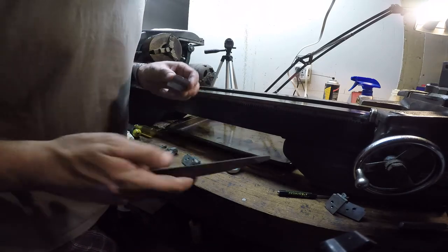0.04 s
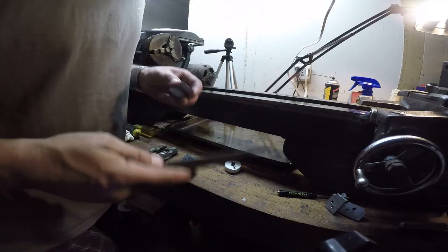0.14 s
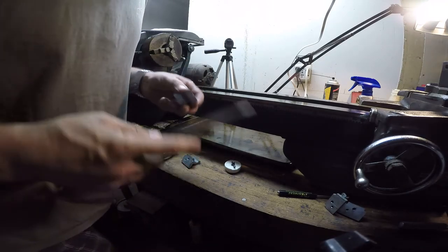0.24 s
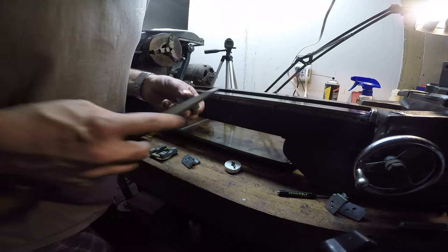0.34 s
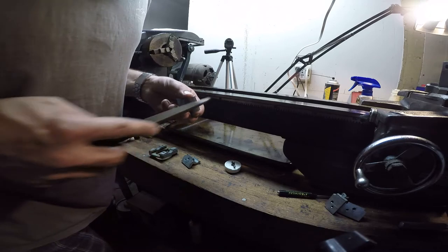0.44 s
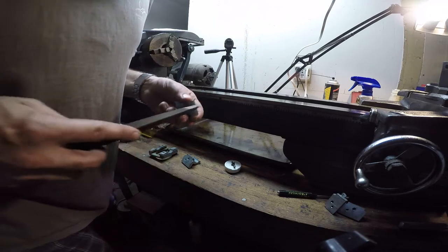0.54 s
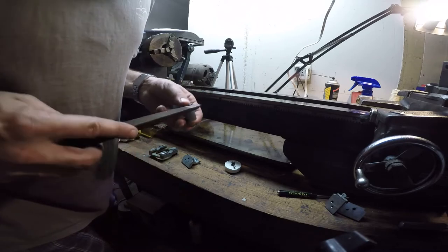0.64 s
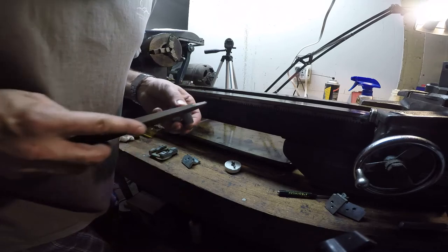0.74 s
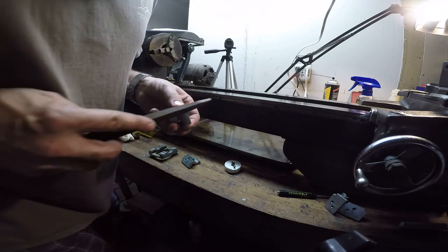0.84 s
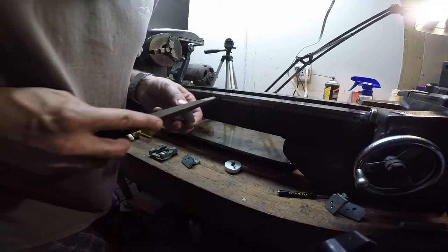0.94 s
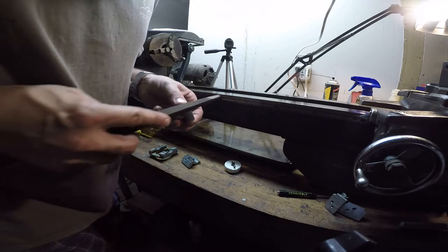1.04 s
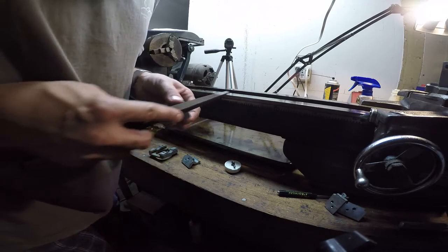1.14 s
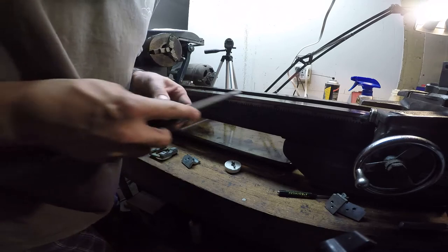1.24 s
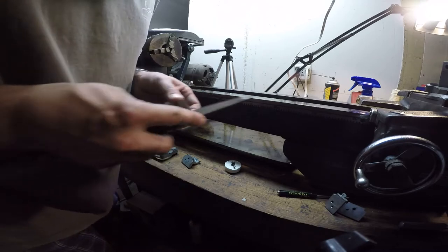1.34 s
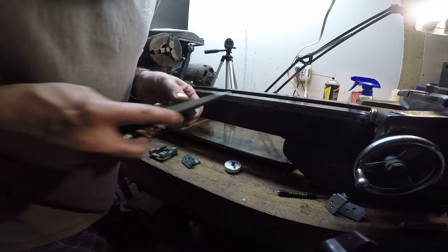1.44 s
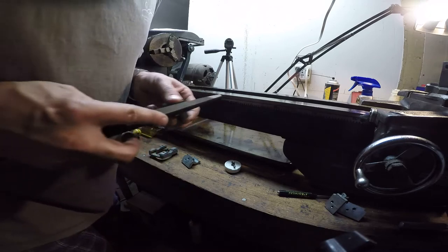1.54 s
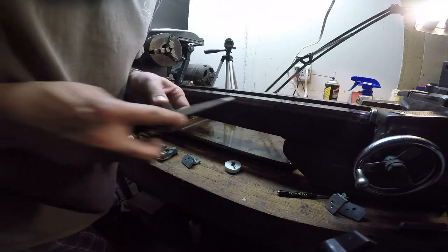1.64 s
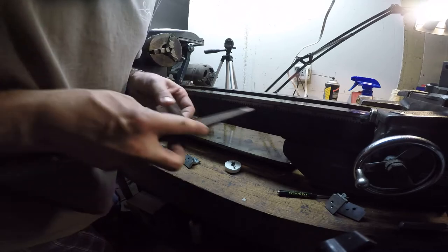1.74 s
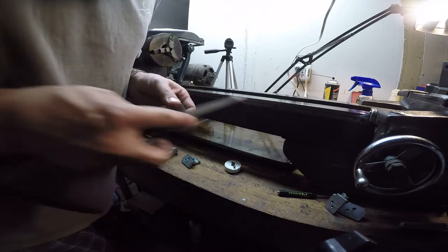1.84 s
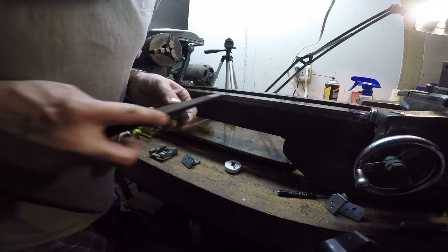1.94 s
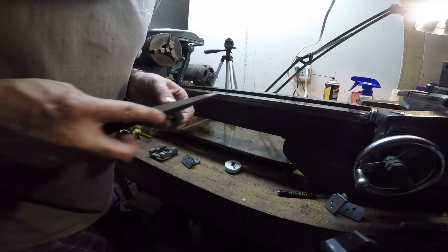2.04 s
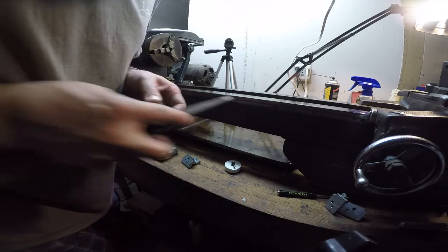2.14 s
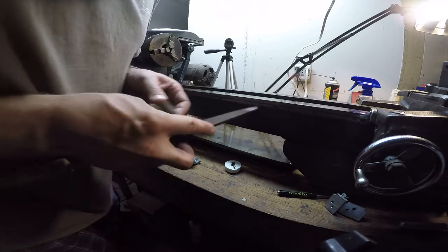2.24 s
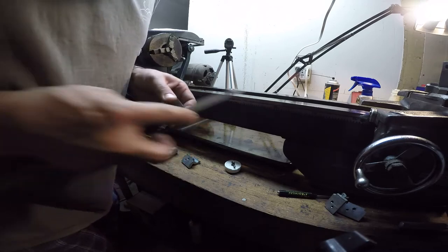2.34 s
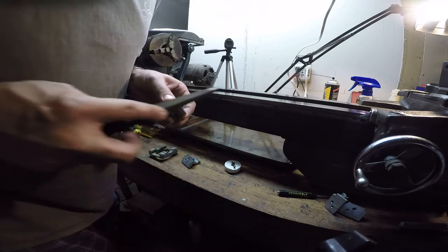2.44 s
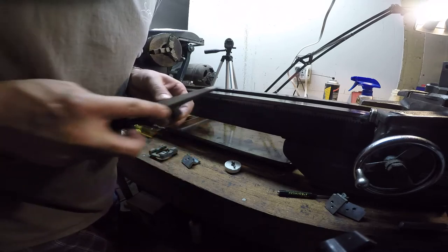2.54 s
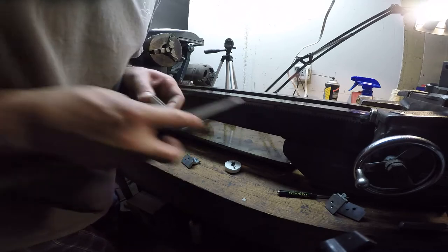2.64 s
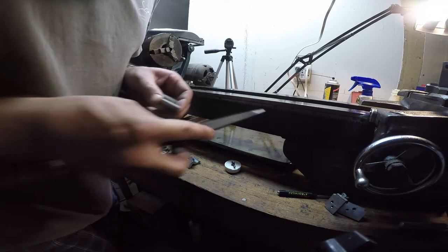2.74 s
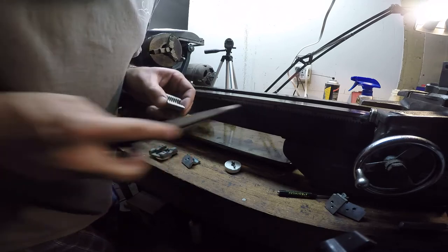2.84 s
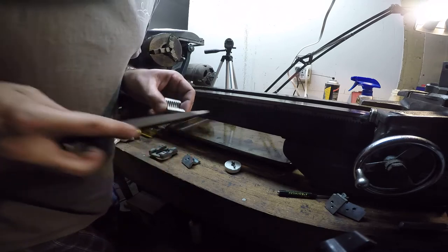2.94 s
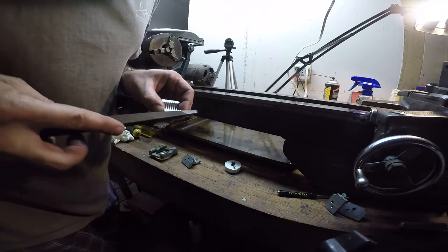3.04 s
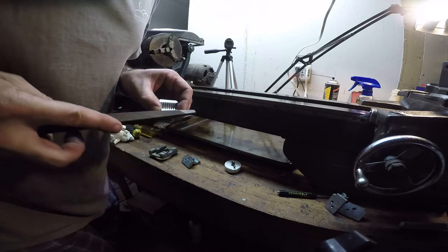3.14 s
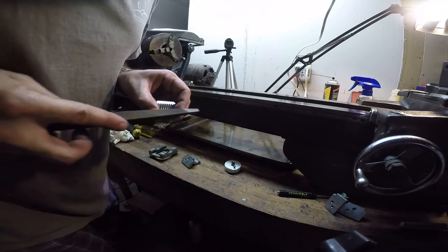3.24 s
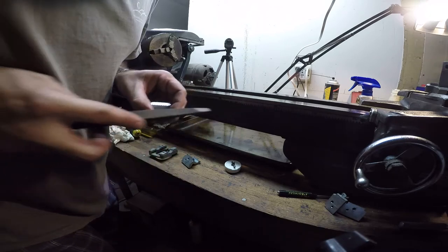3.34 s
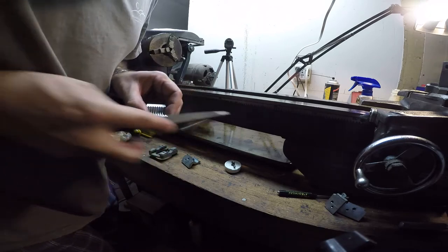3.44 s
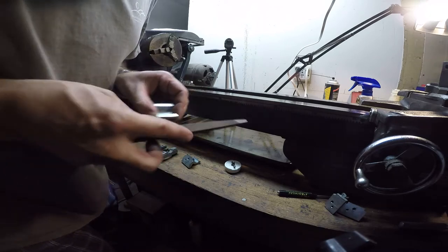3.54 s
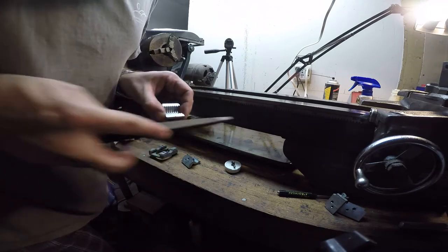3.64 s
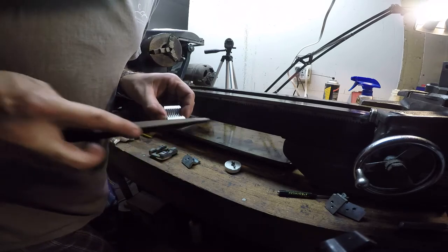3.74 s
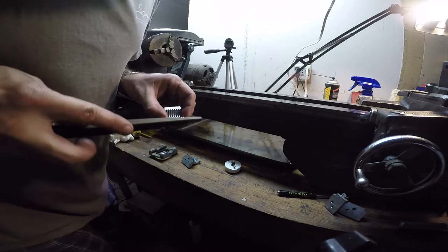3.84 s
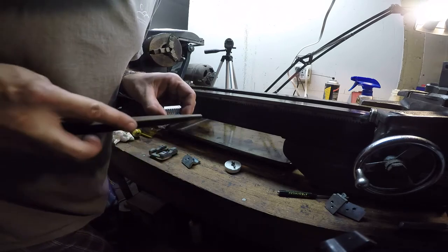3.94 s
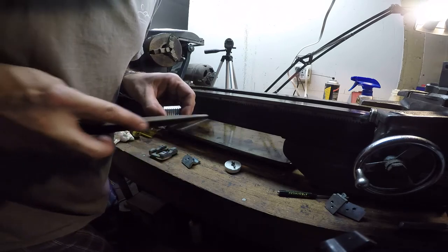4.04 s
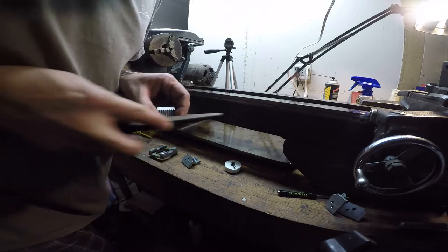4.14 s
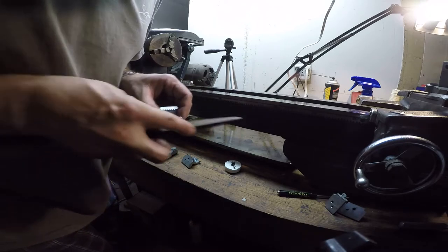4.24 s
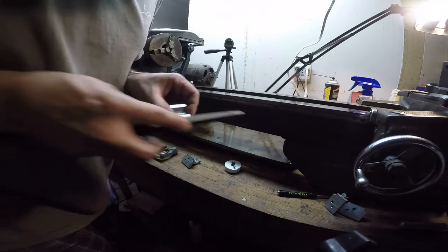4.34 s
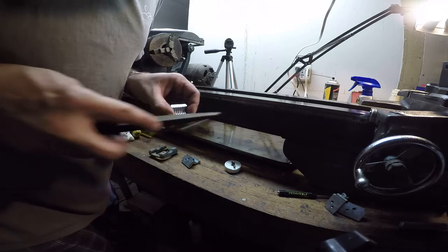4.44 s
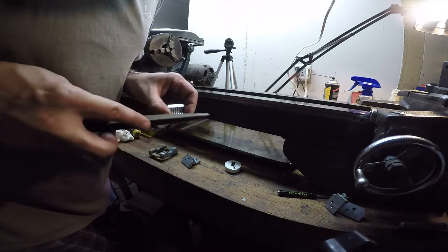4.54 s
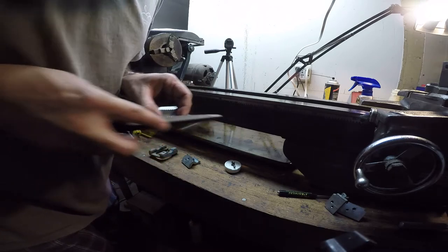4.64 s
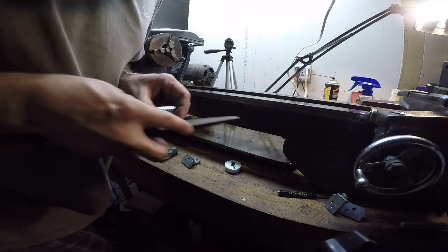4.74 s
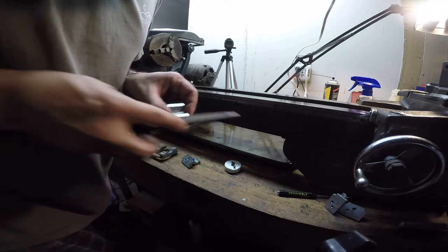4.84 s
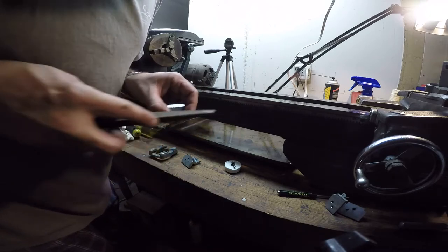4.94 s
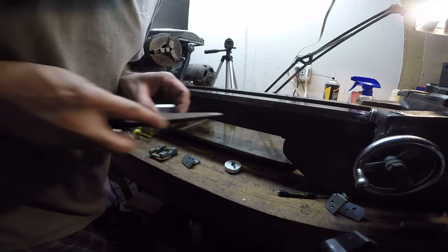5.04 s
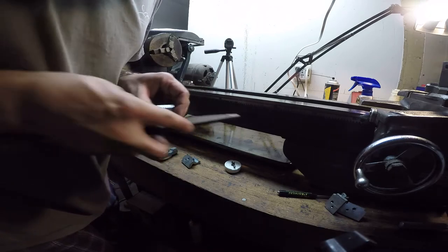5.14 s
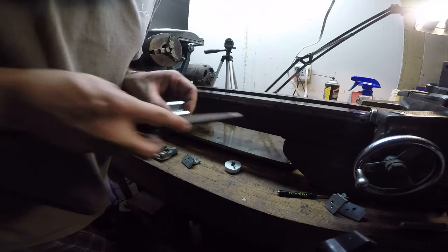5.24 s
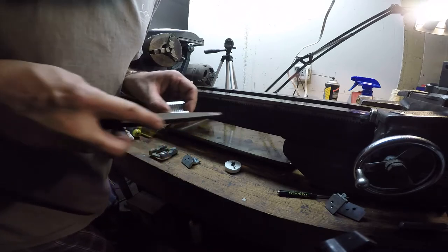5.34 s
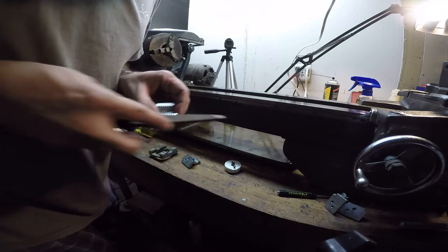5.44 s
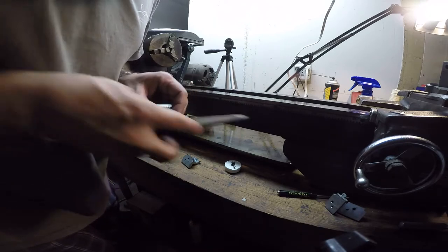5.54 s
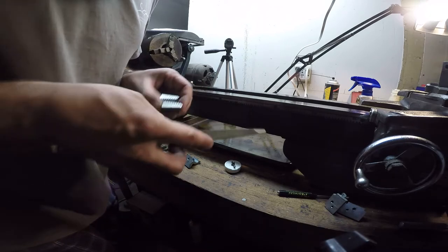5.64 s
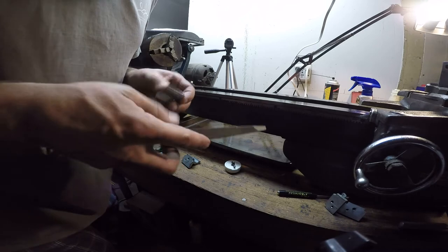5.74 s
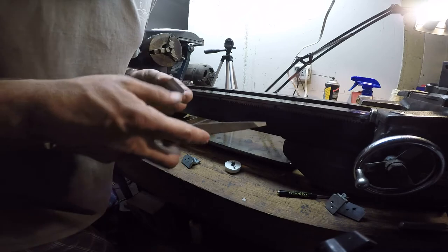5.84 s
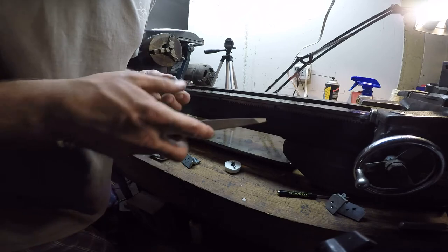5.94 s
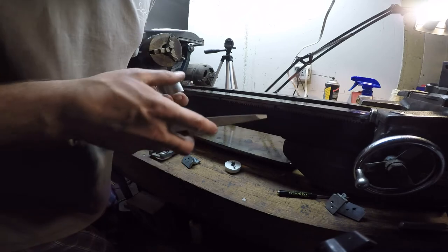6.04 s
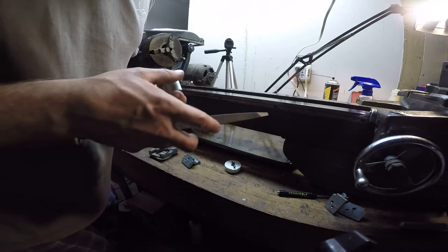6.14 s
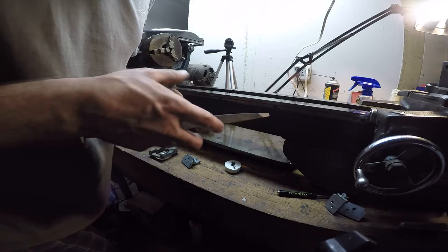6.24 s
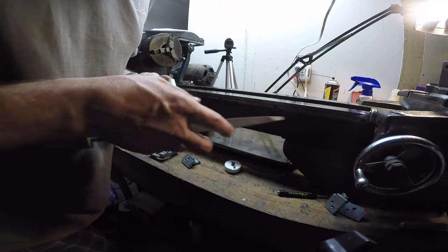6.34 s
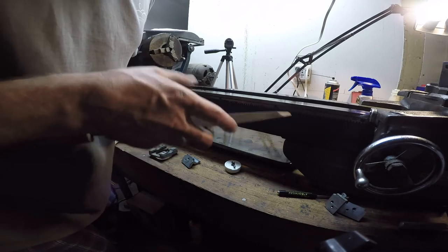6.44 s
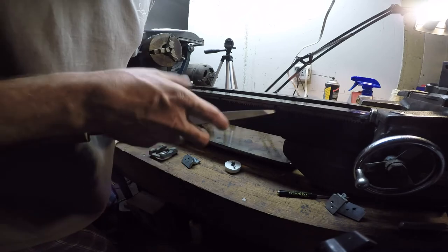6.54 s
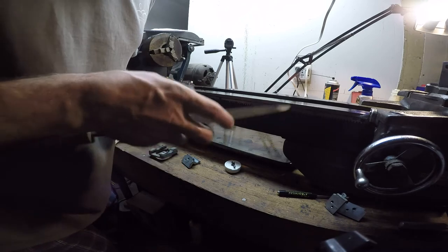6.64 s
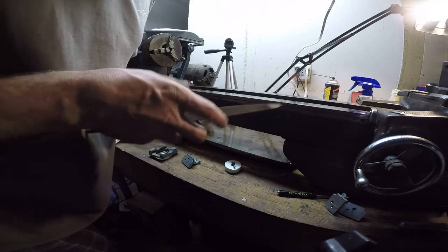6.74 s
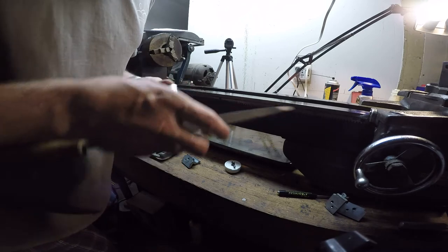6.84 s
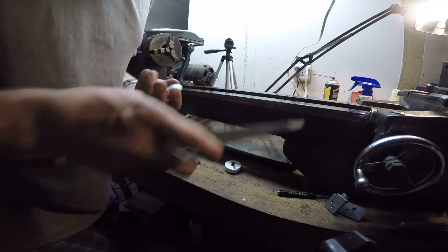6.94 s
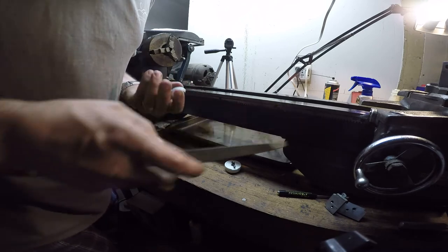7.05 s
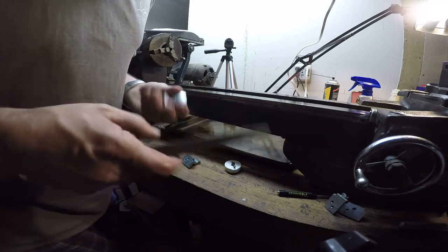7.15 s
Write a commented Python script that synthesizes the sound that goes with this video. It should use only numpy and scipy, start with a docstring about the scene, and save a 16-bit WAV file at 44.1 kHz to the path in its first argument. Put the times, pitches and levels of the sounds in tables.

```python
"""A quiet workshop, one microphone close to a small metal part held in the fingers.
First the room tone: low rumble, hiss, mains hum and a thin electrical whine. Just before one second
a flat hand file is set down with a tick. Nine short strokes follow, the first over a dull rub: the teeth
rasp over the edge and ring the steel, and the small room answers. In the sixth, near four seconds,
they catch evenly and squeal. The last stroke ends before six seconds and leaves the room tone."""
import sys
import numpy as np
from scipy import signal
from scipy.fft import rfft, irfft
from scipy.io import wavfile

SR = 44100
rng = np.random.default_rng(int(sys.argv[2]) if len(sys.argv) > 2 else 0)


def wav_record(signal):
    """Record a signal, one row per channel, as 16-bit PCM in the file named by sys.argv[1]."""
    frames = np.transpose(np.atleast_2d(signal))
    bounded = np.clip(frames, -1, 1)
    # unit amplitude maps onto the largest positive 16-bit level
    quanta = np.round(bounded * 32767).astype(np.int16)
    wavfile.write(sys.argv[1], SR, quanta)


N = 317299


def undb(db):
    """Decibels to gain."""
    return 10 ** (np.asarray(db) / 20)


def unit(x):
    """Scale to rms 1."""
    return x / np.sqrt(np.mean(x ** 2))


def gains(points, size):
    """Gain of a (Hz, dB) spectrum on the bins of a transform."""
    hz, db = np.transpose(points)
    bin_hz = np.arange(size // 2 + 1) * SR / size
    return undb(np.interp(np.log(bin_hz + 1), np.log(hz), db))


def lowpass(x, hz, order=2):
    """Butterworth low-pass."""
    return signal.sosfilt(signal.butter(order, hz, fs=SR, output="sos"), x)


def brighten(x, db, corner_hz):
    """Raise or lower everything above the corner."""
    backward = lowpass(x, corner_hz, order=3)[::-1]
    dull = lowpass(backward, corner_hz, order=3)[::-1]
    return dull + undb(db) * (x - dull)


def walk(rate, size):
    """A smooth random wander with a spread near 1 and `rate` new values a second."""
    knots = np.arange(size) * rate / SR
    count = int(knots[-1]) + 2
    return np.interp(knots, np.arange(count), rng.standard_normal(count))


def clicks(places, heights, size, lobes=8):
    """Band-limited clicks at fractional sample places."""
    index = places.astype(int)[:, None] + np.arange(1 - lobes, lobes + 1)
    offset = index - places[:, None]
    shape = heights[:, None] * np.sinc(offset) * np.sinc(offset / lobes)
    return np.bincount(np.clip(index, 0, size - 1).ravel(), shape.ravel(), size)


def add(track, start_s, sound):
    """Mix a sound into the track."""
    start = int(start_s * SR)
    track[start:start + len(sound)] += sound[:N - start]


# The workshop air at the microphone. Each row: frequency in Hz, relative density in dB.
AIR_SPECTRUM = [(10, -11), (26, -0.5), (52, -1), (80, -11), (170, -13), (350, -22.5), (700, -27),
                (1500, -29.5), (2600, -28.5), (5000, -32.5), (9000, -38), (15000, -41.5)]


def air(level_db=-57.5):
    """Steady low rumble and even hiss fill the room."""
    noise = rfft(rng.standard_normal(N))
    return undb(level_db) * unit(irfft(noise * gains(AIR_SPECTRUM, N), N))


# Electrical tones in the background. Each row: frequency in Hz, rms level in dB.
MAINS_TONES = [(59.5, -65), (5560, -85.5), (6293.6, -78.5), (6323, -85.5), (12586, -90.5), (12617.4, -72)]


def mains(flutter_db=1.5):
    """Mains hum and a thin electrical whine flutter slightly together."""
    t = np.arange(N) / SR
    tones = sum(undb(db) * np.sin(2 * np.pi * (hz * t + rng.random())) for hz, db in MAINS_TONES)
    return np.sqrt(2) * tones * undb(flutter_db * walk(100, N))


# Close by, the blade knocks on the part or a tooth catches its edge. Each row: start in seconds,
# force in dB, hardness as a cutoff in Hz, boost of the main ring in dB.
KNOCKS = [(.860, -52.5, 6500, -7), (0.966, -48, 6000, -3), (1.020, -44, 4500, -8),
          (1.0779, -31.5, 3480, -9), (1.0885, -32, 3400, -7), (1.111, -34, 3380, 0.5),
          (1.1235, -30.5, 3150, 0), (1.1503, -25.5, 3700, -10), (1.177, -27, 3200, -10),
          (1.4845, -34.5, 3160, -7.5), (1.613, -33, 3000, 6), (2.0305, -29, 6400, -14),
          (2.5368, -34, 4600, -2), (3.2088, -44.5, 1900, 5), (3.358, -45, 6000, -12.5),
          (3.989, -36.5, 2681, -5), (4.127, -29.5, 4100, -14), (4.5563, -37.5, 4000, -3),
          (4.669, -37, 2508, 0), (4.9614, -36, 4620, -1), (5.093, -37.5, 5000, -2.5), (5.4, -28, 6220, -8),
          (5.430, -33, 2995, -8), (5.4576, -31, 6500, -8)]


def knocks(push_db=18, skid_db=3, skid_s=.0017, snap_db=-20, thin_hz=1900, size=1024):
    """Each knock is one push and a brief skid that ring the steel; a softer contact is duller."""
    out = np.zeros(N)
    for start, force_db, hard_hz, ring_db in KNOCKS:
        blow = undb(skid_db) * rng.standard_normal(size) * np.exp(-np.arange(size) / SR / skid_s)
        blow[0] += undb(push_db)
        snap = undb(snap_db) * np.diff(blow, prepend=0)  # the tooth tips add a fine, bright edge
        force = undb(force_db) * (lowpass(blow, hard_hz, order=3) + snap)
        thin = force - lowpass(force, thin_hz, order=1)
        add(out, start, steel(thin, bend_db=7.5, ring_db=ring_db, uneven_db=-1.5, drift=0))
    return out


# Modes of blade and part, damped by the hands: bending mode first, then the main ring.
# Each row: frequency in Hz, width in Hz, height over the broad radiation in dB.
STEEL_MODES = [(1000.6, 23.7, 10.5), (2022.5, 60.6, 24), (2377, 152, 10.5), (3277, 42, 18.5),
               (3303, 69.6, 17), (3580, 270, 12), (4756, 104.5, 20.5), (4760, 19, 12.5), (5508, 97, 8),
               (6410, 49, 22), (6650, 68, 15), (8165, 47, 19), (9503, 140, 14.5), (10900, 370, 9),
               (14300, 120, 12)]
# The steel's broad radiation at the microphone. Each row: frequency in Hz, relative level in dB.
STEEL_RADIATION = [(100, -32.5), (400, -28.5), (800, -31.5), (1150, -21.5), (1800, -19), (2900, -14.5),
                   (4300, -25), (7000, -23.5), (8700, -34), (11500, -37.5), (13000, -54), (15000, -43)]


def steel(force, bend_db, ring_db, shift_hz=0, uneven_db=2.2, drift=.0095, size=4096):
    """The force rings modes that stand out of the broad radiation; the grip acts on the lowest two."""
    hz, width, db = np.transpose(STEEL_MODES)
    # each contact point excites and loads the modes differently
    excited, loaded = rng.standard_normal((len(hz), 2)).T
    db = db + uneven_db * excited
    hz = hz * (1 + drift * loaded)
    db[:2] += bend_db, ring_db
    hz[1] += shift_hz
    width[:2] *= undb(-.1 * bend_db)  # a loose grip lets the low modes ring longer
    bin_hz = np.arange(size // 2 + 1) * SR / size
    detune = (bin_hz[:, None] - hz) / width
    skirts = np.exp(-(detune / 4.6) ** 2)
    peaks = undb(db) ** 2 / (1 + (2 * detune) ** 2) * skirts
    spectrum = gains(STEEL_RADIATION, size) * np.sqrt(1 + peaks.sum(axis=1))
    cepstrum = irfft(np.log(spectrum))
    cepstrum[1:size // 2] *= 2
    cepstrum[size // 2 + 1:] = 0  # causal: nothing sounds before the blow
    response = irfft(np.exp(rfft(cepstrum)))
    return signal.fftconvolve(force, response / np.linalg.norm(response))[:N]


def room(direct, level_db=-16.5, t60_s=.22, first_s=.0081, dull_hz=7000):
    """Bench, lathe and walls return a short, dense tail, well below the direct sound."""
    t = np.arange(SR // 2) / SR
    tail = lowpass(rng.standard_normal(len(t)), dull_hz, order=1)
    tail *= undb(-60 * t / t60_s) * (t > first_s)
    return undb(level_db) * signal.fftconvolve(direct, tail / np.linalg.norm(tail))[:N]


def rub(start_s=1.0, length_s=.27, centre_hz=396, spread=1.32, level_db=-65):
    """A dull rubbing noise swells and fades under the first, slow stroke."""
    size = int(length_s * SR)
    band = signal.butter(2, [centre_hz / spread, centre_hz * spread], "bandpass", fs=SR, output="sos")
    noise = unit(signal.sosfilt(band, rng.standard_normal(size)))
    swell = np.sin(np.pi * np.arange(size) / size)
    out = np.zeros(N)
    add(out, start_s, undb(level_db) * noise * swell)
    return out


def teeth(hz, rough, cross_cut=.71, scatter_db=2, waver=.007, slip_spacings=.05):
    """One click per tooth; a rough pass makes their timing and strength uneven."""
    size = len(hz)
    passed = np.cumsum(hz * (1 + waver * walk(256.3, size))) / SR
    tooth = np.arange(1, int(passed[-1]))
    places = np.interp(tooth, passed, np.arange(size))
    at = places.astype(int)
    late, strong = rng.standard_normal((len(at), 2)).T
    places += slip_spacings * rough[at] * late * SR / hz[at]
    alternate = 1 + cross_cut * rough[at] * (-1) ** tooth  # the second cut favours every other tooth
    force = clicks(places, undb(scatter_db * rough[at] * strong) * alternate, size)
    return unit(force - force.mean())


def chips(size, per_s=7000, spread_db=3.5):
    """Tiny chips tear off at random, a few much larger than the rest."""
    place, chance, sign = rng.random((int(per_s * size / SR), 3)).T
    heights = undb(-spread_db * np.log(np.maximum(chance, .01)))
    return unit(clicks(place * size, np.sign(sign - .5) * heights, size))


def rasp(controls, sheen_db, teeth_db=2, chips_db=-1, judder_db=2, bite_hz=4400, sheen_hz=8000):
    """Force of one pass: teeth and chips, juddering in the hand; a deeper bite adds treble."""
    tooth_hz, force_db, bite_db, rough = controls  # one value per sample
    rough = np.clip(rough, 0, 1)
    ridges = undb(teeth_db) * lowpass(teeth(tooth_hz, rough), hz=4800, order=3)
    grit = undb(chips_db) * chips(len(rough))
    force = np.sqrt(1 - rough ** 2) * ridges + rough * grit
    force = brighten(force, bite_db, bite_hz)
    tips_db = .33 * (force_db.max() - np.maximum.accumulate(force_db))  # tips sparkle before digging in
    force = brighten(force, sheen_db + tips_db - .35 * bite_db, sheen_hz)  # sheen follows the bite less
    return force * undb(force_db + judder_db * walk(260, len(force)))


def file_pass(track, start, controls, bend_db, ring_db, sheen_db, hop=1024):
    """The rasp drives the steel; the contact travels along the blade, so the ring keeps changing."""
    force = rasp(controls, sheen_db)
    shift_hz = 8 * (undb(bend_db) - 1)  # a looser grip raises the main ring
    for centre in range(0, len(force) + hop, hop):
        share = np.maximum(1 - np.abs(np.arange(len(force)) - centre) / hop, 0)
        add(track, start, steel(force * share, bend_db, ring_db, shift_hz))


def hand(skim_s, cut_s, touch_db, skim_db, cut_db, first_bite_db, last_bite_db, rough, skim_hz, loaded_s,
         touch_s=.004, dig_s=.0058, lift_s=.05, loaded_hz=1044.4, settle_s=.011, lurch_db=.94):
    """The hand touches, skims, digs in, cuts and lifts; under load the tooth rate settles."""
    cut_end = skim_s + cut_s
    t = np.arange(int((cut_end + lift_s) * SR)) / SR
    phases = np.maximum.accumulate([0, touch_s, skim_s - dig_s, skim_s, cut_end, cut_end + lift_s])
    tooth_hz = loaded_hz + (skim_hz - loaded_hz) / (1 + np.exp((t - loaded_s) / settle_s))
    force_db = np.interp(t, phases, [touch_db - 18.5, touch_db, skim_db, cut_db, cut_db, cut_db - 40.5])
    force_db += lurch_db * walk(66.8, len(t))  # the hand does not push evenly
    bite_db = np.interp(t, phases[2:], [-9.5, first_bite_db, last_bite_db, -24])
    roughness = np.interp(t, phases[2:], [.88, rough, rough, .93])
    return tooth_hz, force_db, bite_db, roughness


# The file at work near the microphone. Each row: start, skim length and cut length in seconds;
# force at first touch, at the skim's end and in the cut in dB; bite (treble) as the cut begins and ends
# in dB; roughness of the cut from 0 (even) to 1 (dry rasp); skim rate in teeth per second; seconds until
# halfway to the loaded rate; boosts of bending mode, main ring and sheen (top treble) in dB.
FILE_STROKES = [ (1.014, .135, .088, -48.5, -46, -35, -20, -9.5, 1.03, 390, .16, -3.5, -2, 7.5),
                (1.549, 0.069, 0.079, -54, -40.5, -32.5, -12, 10.5, 0.82, 1707, 0.089, 1.5, -0.5, -4),
                (2.042, 0.086, 0.038, -54.5, -37, -37, -2, -1, 0.81, 1611, 0.062, 13.5, 2, 5),
                (2.549, .021, .054, -55, -45, -38, -16, -5, .68, 1657, 0.04, 14, 0.5, 12.5),
                (3.334, .113, .013, -59, -56, -38, -13, -14, 0.49, 1133, 0.12, 2, 1.5, 8.5),
                (4.581, .122, .030, -58.5, -45, -33, 2.5, 7.5, 0.65, 1490, .137, 5, 4, -3),
                (5.012, .081, .058, -46.5, -43.5, -35.5, 3, 11.5, 0.66, 1550, 0.097, 3, 2.5, -12),
                (5.414, .043, .052, -48, -42, -33, 1.5, 8.5, 0.85, 1034, .1, -17, 0, -1.5), ]


def strokes():
    """Eight rasping strokes skim the edge, cut and lift off, each with its own grip."""
    out = np.zeros(N)
    for start, *motion, bend_db, ring_db, sheen_db in FILE_STROKES:
        file_pass(out, start, hand(*motion), bend_db, ring_db, sheen_db)
    return out


# The course of the squealing stroke, at the same spot. Each row: time in seconds,
# rate in teeth per second, force in dB, bite in dB, roughness from 0 to 1.
SQUEAL_COURSE = [(4.1, 998, -58, -7, .87), (4.13, 1077, -42.5, 0, .45), (4.148, 1234, -37.5, 15.5, 0.22),
                 (4.16, 1132, -40, 3.5, 0.4), (4.173, 1084, -30, -13, 0), (4.184, 980, -32.5, -10, 0.03),
                 (4.197, 1009, -33, 7.5, 0.4), (4.213, 1075, -42, -7, 0.4), (4.239, 1052, -51, -22, 0.65)]


def squeal():
    """The teeth catch evenly, so their clicks merge into a pitched squeal."""
    times, *columns = np.transpose(SQUEAL_COURSE)
    t = np.arange(int(times[0] * SR), int(times[-1] * SR)) / SR
    controls = [np.interp(t, times, column) for column in columns]
    out = np.zeros(N)
    file_pass(out, times[0], controls, bend_db=-6, ring_db=-7.5, sheen_db=2)
    return out


def scene():
    """In mono: the filing up close, its reflections behind it and the room tone beneath."""
    filing = knocks() + rub() + strokes() + squeal()
    return (filing + room(filing) + air() + mains())[None]


def record(dry, top_hz=15100):
    """The camera's microphone channel cuts the top steeply."""
    return signal.sosfilt(signal.ellip(10, .1, 70, top_hz, fs=SR, output="sos"), dry)


dry = scene()
out = record(dry)
wav_record(out)
```